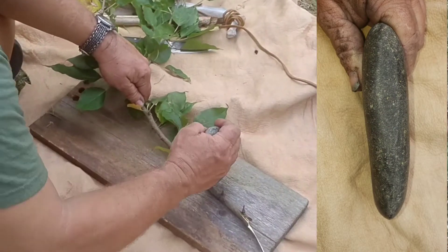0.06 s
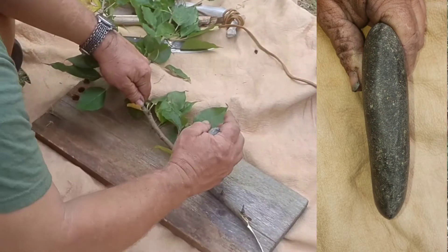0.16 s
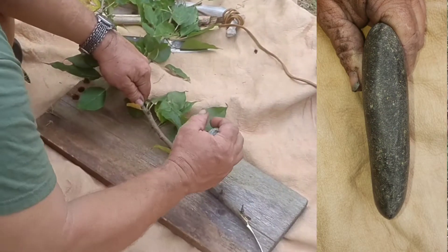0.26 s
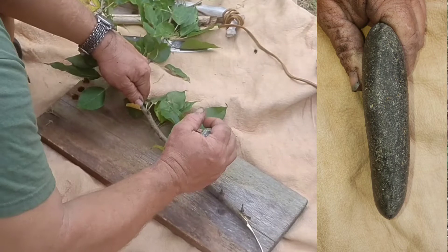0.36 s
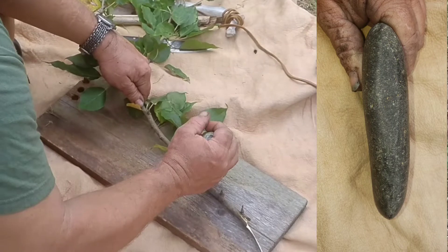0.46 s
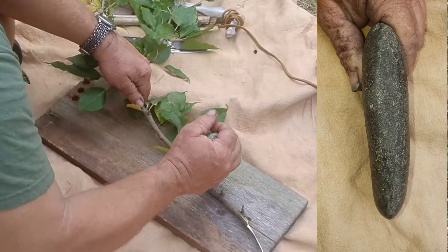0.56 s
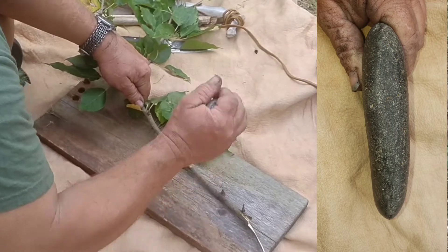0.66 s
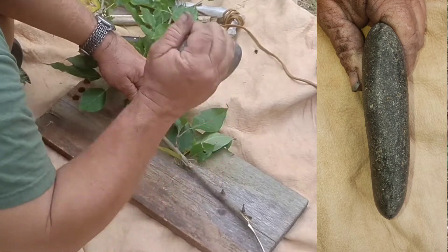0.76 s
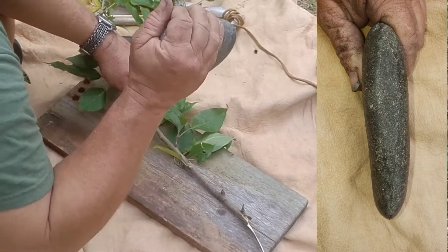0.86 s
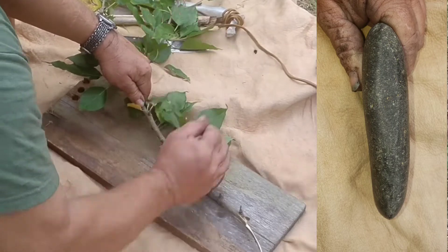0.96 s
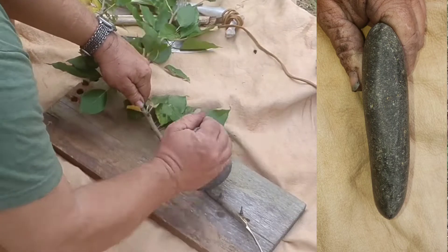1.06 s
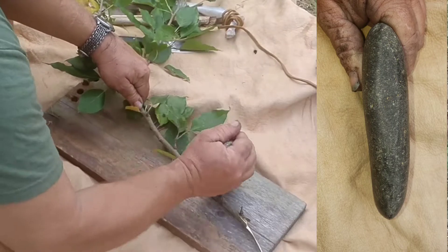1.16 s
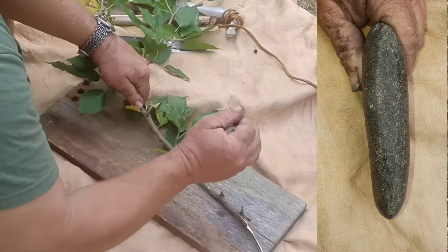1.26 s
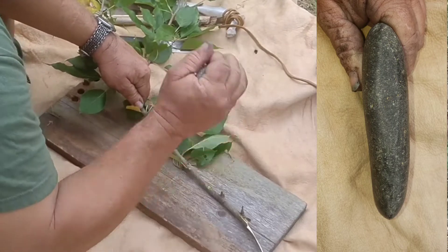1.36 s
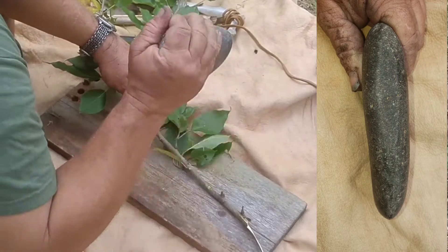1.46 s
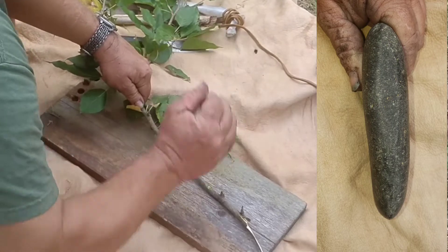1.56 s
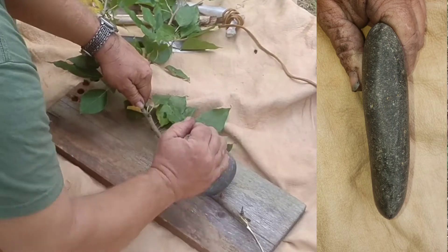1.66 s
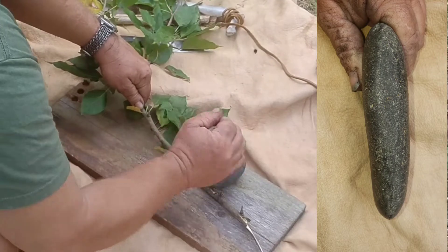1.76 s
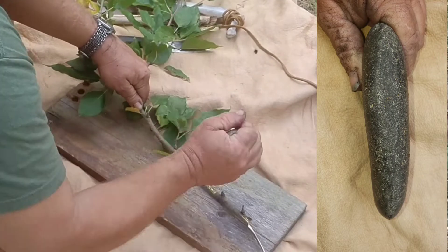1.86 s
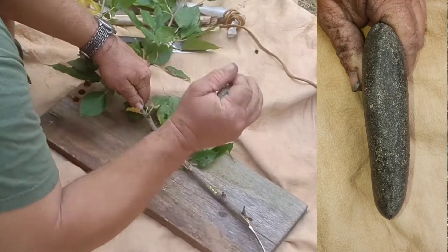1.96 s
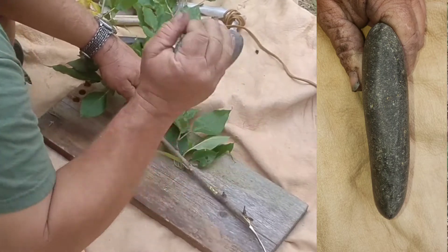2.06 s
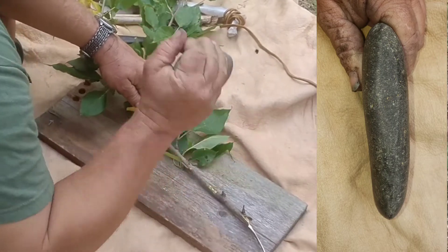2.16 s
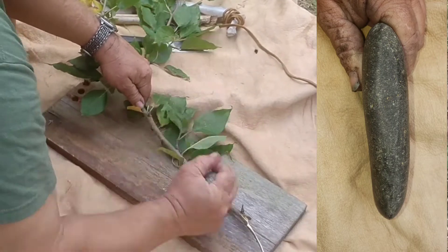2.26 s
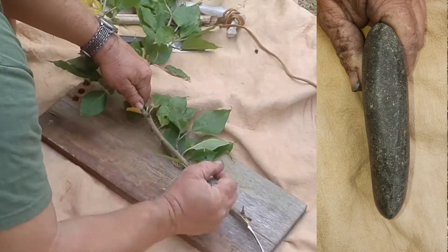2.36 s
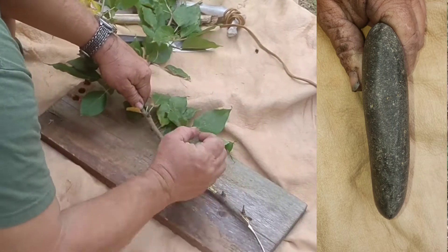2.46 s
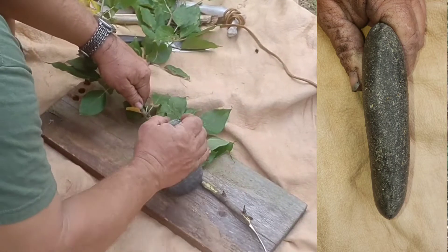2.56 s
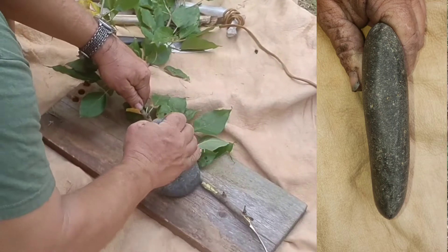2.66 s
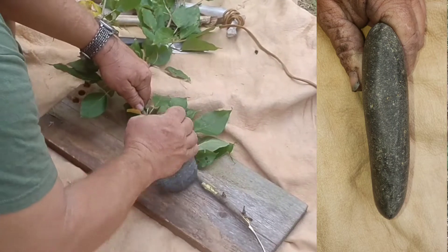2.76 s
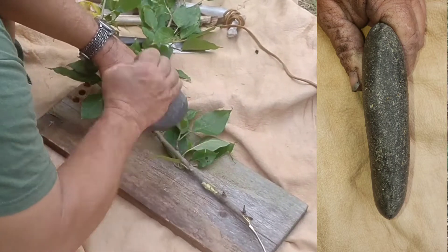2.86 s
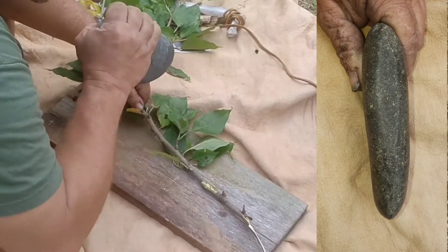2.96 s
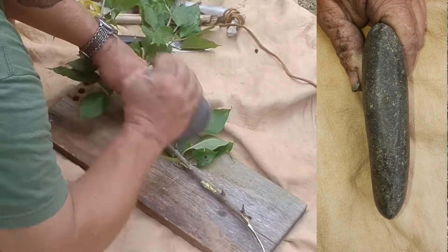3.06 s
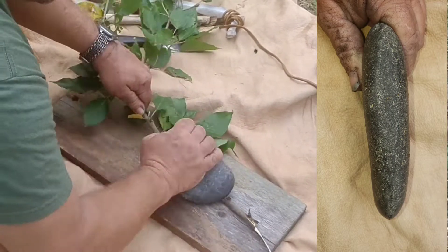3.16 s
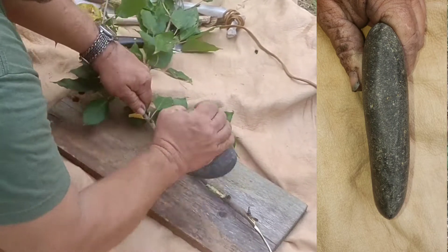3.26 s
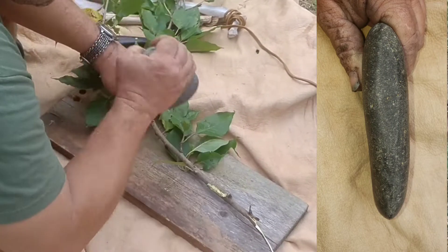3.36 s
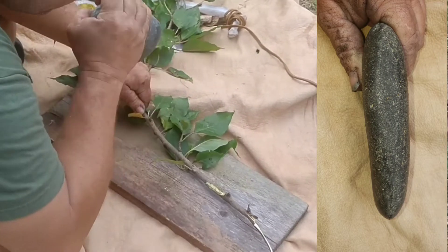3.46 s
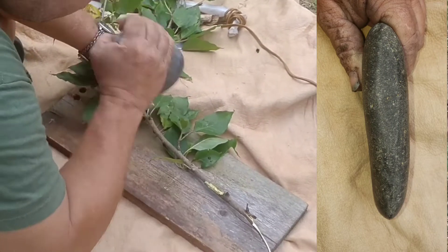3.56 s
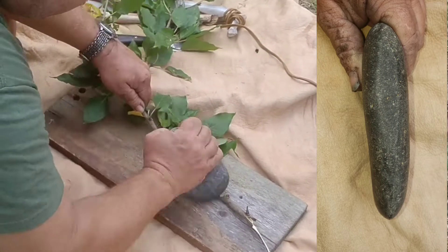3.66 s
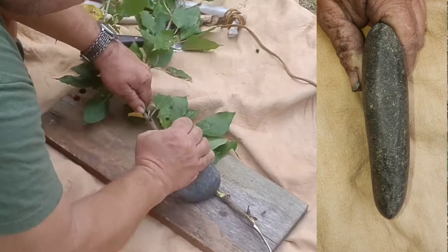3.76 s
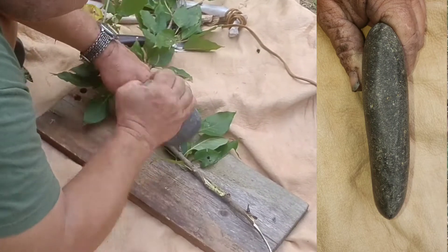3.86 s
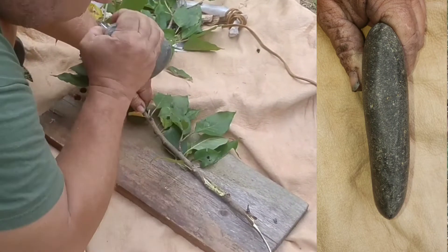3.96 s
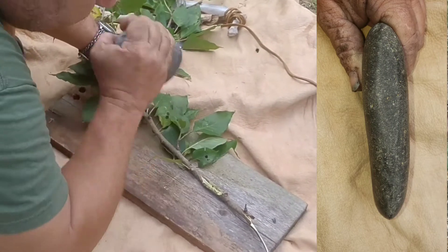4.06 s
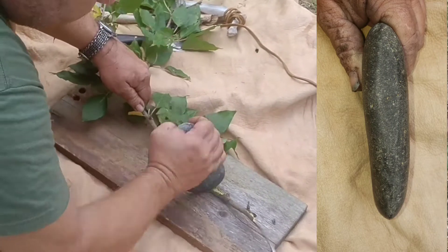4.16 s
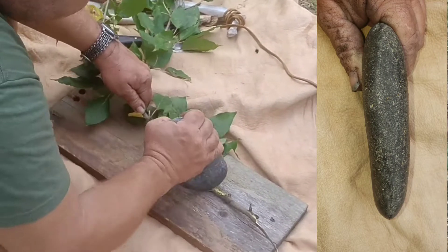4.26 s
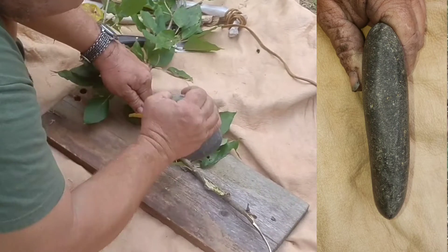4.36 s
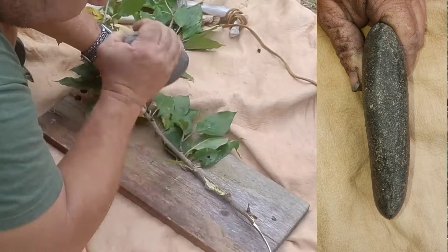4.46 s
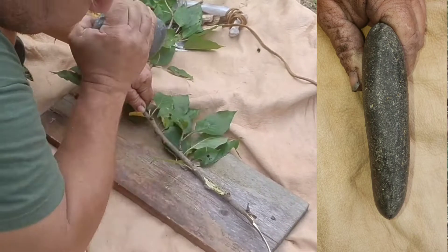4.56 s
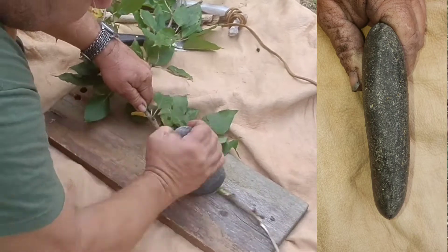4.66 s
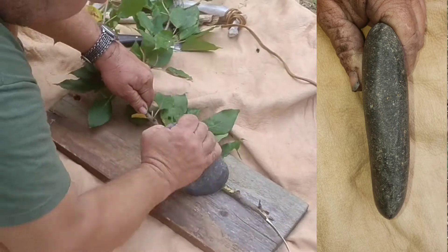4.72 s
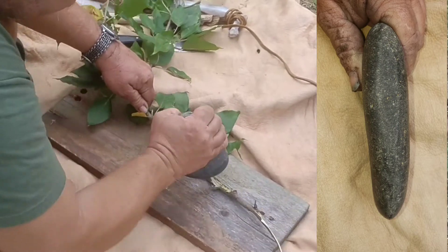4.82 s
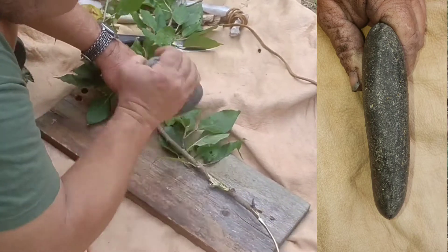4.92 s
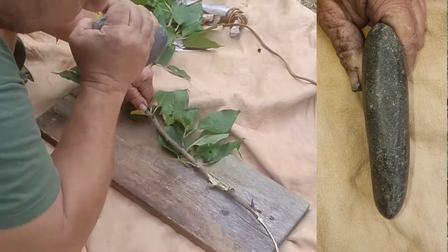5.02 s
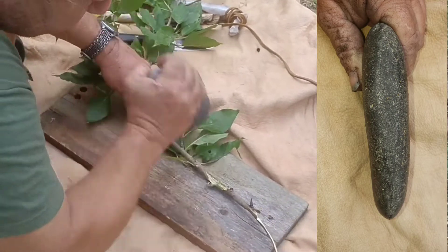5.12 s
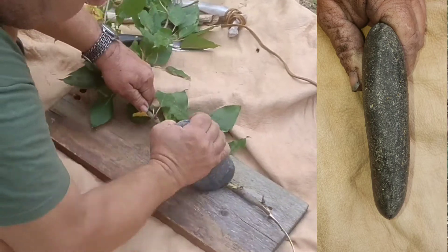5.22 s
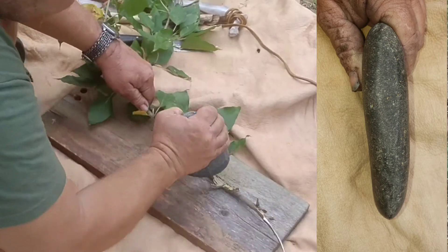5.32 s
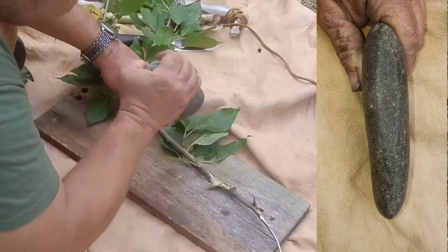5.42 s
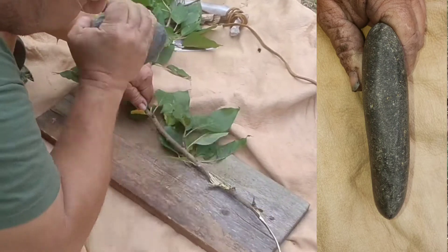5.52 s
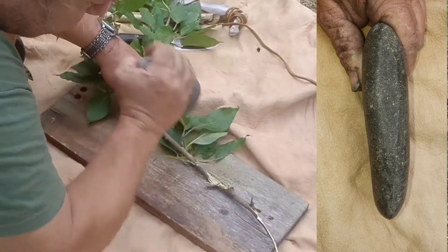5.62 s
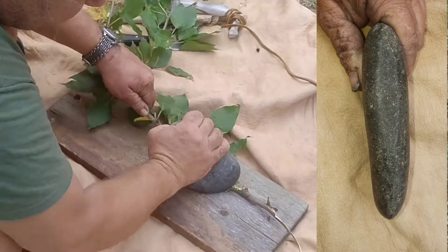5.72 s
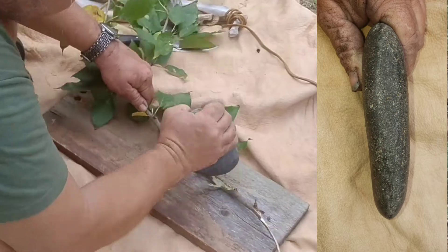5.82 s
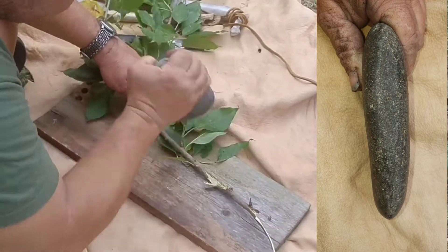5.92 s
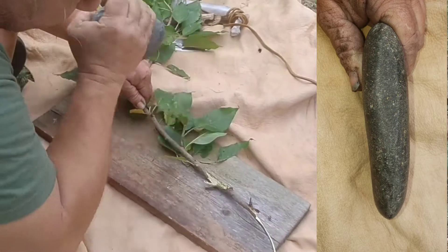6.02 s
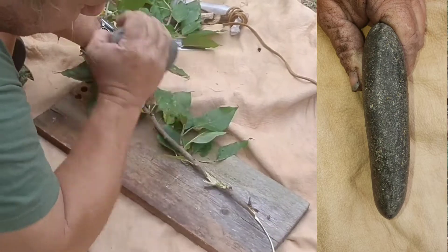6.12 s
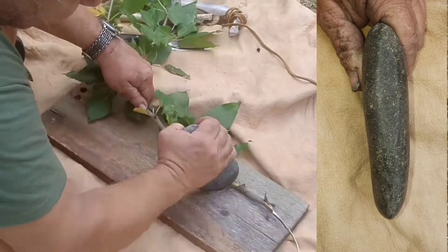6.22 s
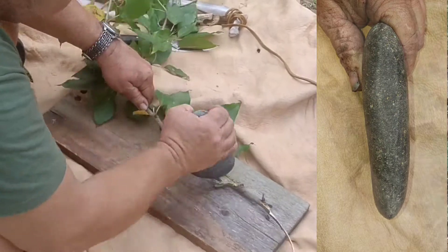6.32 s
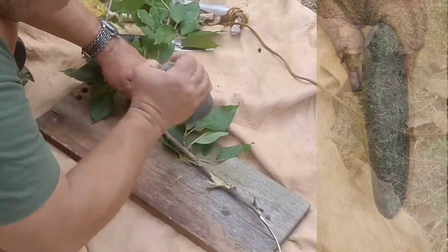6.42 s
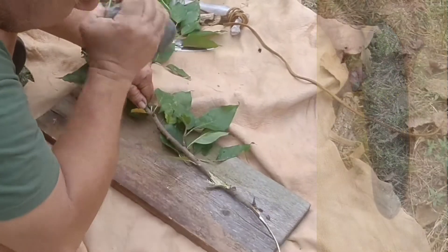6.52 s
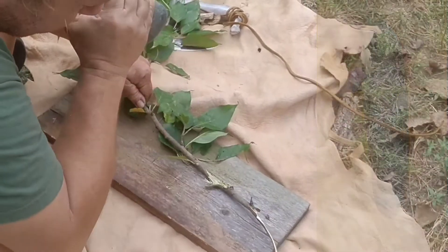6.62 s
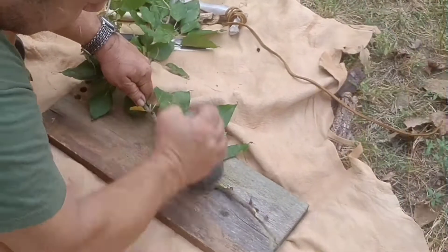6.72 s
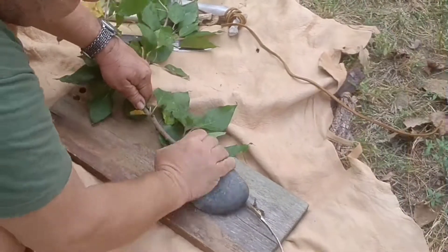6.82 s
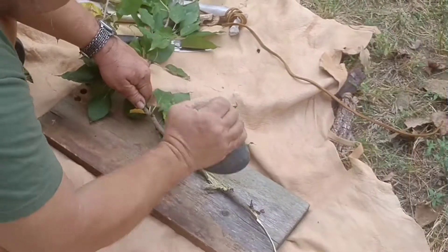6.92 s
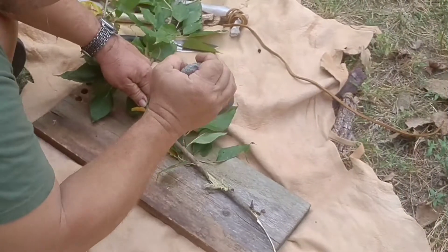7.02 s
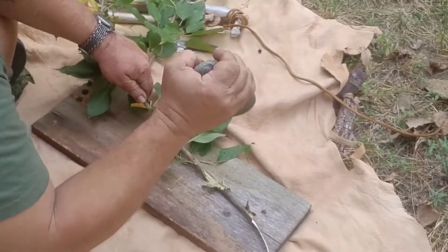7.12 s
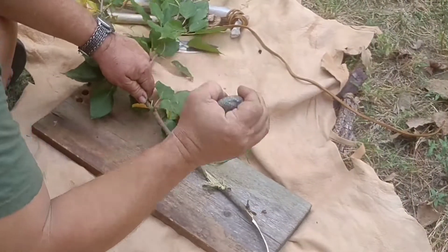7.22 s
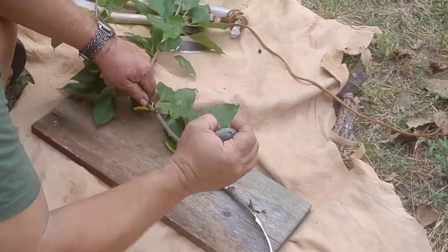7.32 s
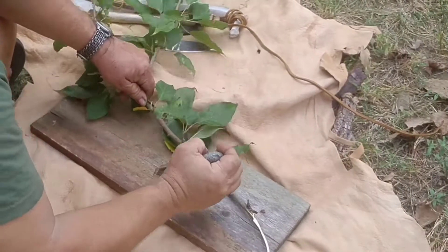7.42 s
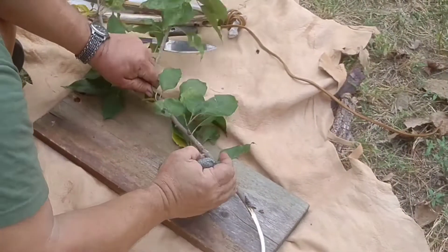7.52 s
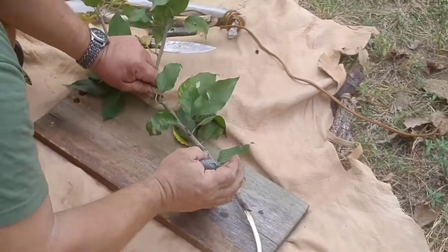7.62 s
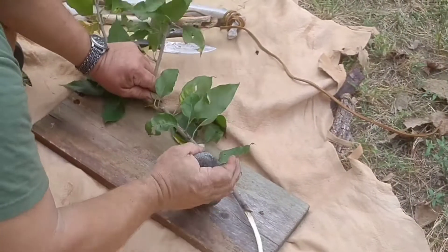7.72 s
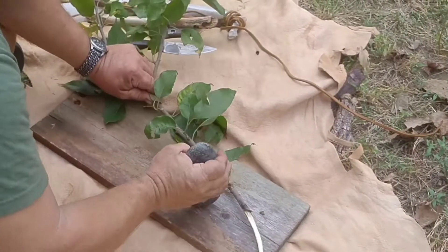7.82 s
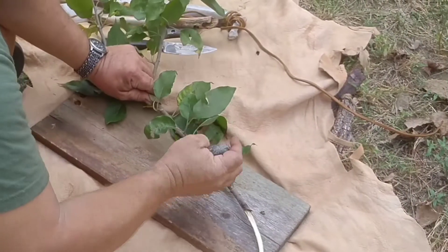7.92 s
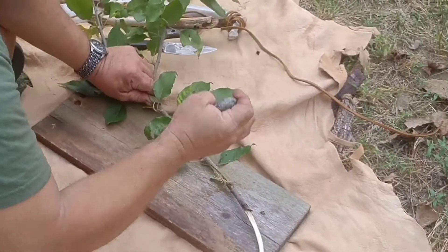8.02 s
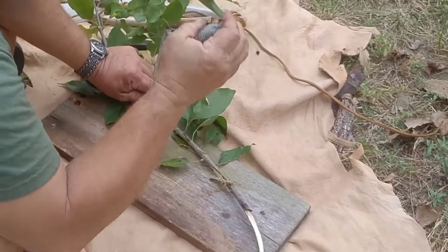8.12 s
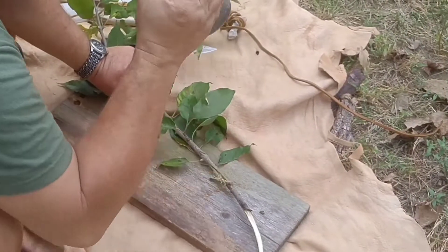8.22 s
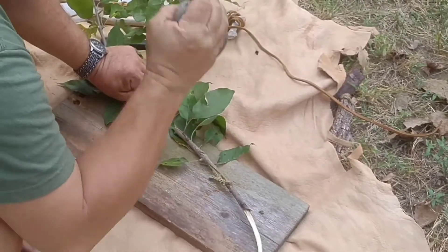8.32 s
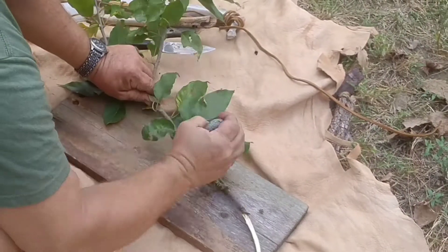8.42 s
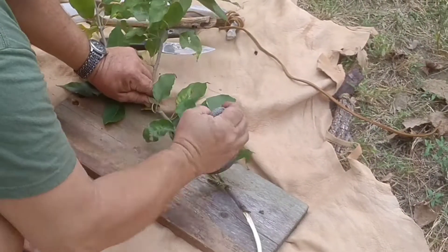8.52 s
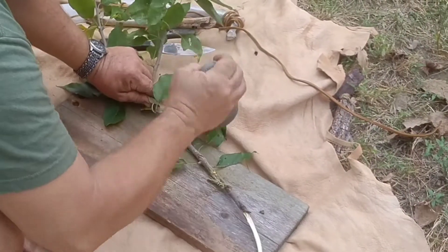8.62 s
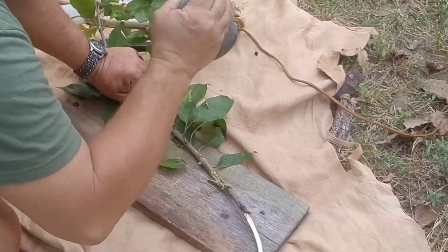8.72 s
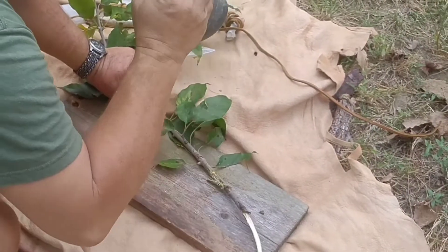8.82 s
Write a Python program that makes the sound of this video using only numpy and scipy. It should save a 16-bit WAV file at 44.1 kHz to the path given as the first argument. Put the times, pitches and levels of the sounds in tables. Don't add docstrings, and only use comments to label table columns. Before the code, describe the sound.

Stone axe blows crack into a green branch on a muffled wooden plank, about two a second, amid insect trills and wind rumble.

```python
import sys
import numpy as np
from scipy import signal
from scipy.fft import rfft, irfft
from scipy.io import wavfile
from scipy.ndimage import uniform_filter1d, minimum_filter1d

SR = 44100
rng = np.random.default_rng(int(sys.argv[2]) if len(sys.argv) > 2 else 0)


def volts_from_decibels(level):
    exponent = np.asarray(level, float) / 20
    return 10 ** exponent


def pcm_store(signal):
    levels = np.round(np.clip(np.atleast_2d(signal), -1, 1) * 32767)
    wavfile.write(sys.argv[1], SR, levels.astype(np.int16).T)


N = 391608


def evened(x):
    return x / np.sqrt(np.mean(x ** 2) + 1e-20)


def sized(x, db):
    return volts_from_decibels(db) * x / np.linalg.norm(x)


def curves(rows):
    s, *columns = np.transpose(rows)
    return [np.interp(np.arange(N) / SR, s, c) for c in columns]


def colour(x, points):
    f, db = np.transpose(points)
    hz = np.fft.rfftfreq(len(x), 1 / SR) + 1
    gain_db = np.interp(np.log(hz), np.log(f), db, db[0] - 30, db[-1] - 27.5)
    return irfft(rfft(x) * volts_from_decibels(gain_db), len(x))


def drift(hz):
    lowpass = signal.butter(2, hz, fs=SR, output="sos")
    return evened(signal.sosfilt(lowpass, rng.standard_normal(N)))


def steady(x, size):
    power = uniform_filter1d(evened(x) ** 2, size=size)
    return evened(x / abs(power + .05) ** 0.41)


def ring(x, hz, width):
    return signal.lfilter(*signal.iirpeak(hz, hz / width, SR), x)


def burst(db, t60, rise=0.0001):
    t = np.arange(9000) / SR
    level = volts_from_decibels(db - 60 * t / max(t60, .004)) * (1 - np.exp(-t / rise))
    return level * rng.standard_normal(len(t))


def add(mix, s, sound):
    part = mix[round(s * SR):][:len(sound)]
    part += sound[:len(part)]


# (pitch_hz, level_db)
AIR_TONE = [(30, -13.5), (150, 2.5), (500, 0.5), (1500, -3), (2200, -8), (3500, -9.5), (7000, -17),
            (15600, -22)]
# (time_s, level_db)
AIR_LEVEL = [(0, -60), (1.0, -61.5), (1.5, -64.5), (4.1, -62), (4.9, -64), (7.5, -60.5), (8.4, -59),
             (8.7, -63)]


def air():
    level_db = curves(AIR_LEVEL)[0] + 5.5 + .5 * drift(3.8)
    return volts_from_decibels(level_db) * evened(colour(rng.standard_normal(N), AIR_TONE))


# (time_s, level_db)
GUSTS = [(0, -50), (.2, -49), (.3, -35), (.47, -37), (.85, -42), (1.3, -45), (1.45, -48.5), (2.12, -49),
         (2.3, -43.5), (2.6, -39), (2.95, -43.5), (3.95, -47), (6.7, -46.5), (6.95, -40), (7.4, -44.5),
         (8.0, -45), (8.1, -50.5), (8.88, -47.5)]
# (pitch_hz, level_db)
RUMBLE_TONE = [(8.8, -36), (27, -11.5), (53, 6.5), (85, 3), (156, -27), (250, -46.5), (320, -60.5),
               (550, -120)]
# (time_s, push_db, flutter_db)
PUFFS = [(.1, -40, -43), (.27, -34.5, -34), (.78, -45, -46), (1.33, -47, -48), (1.48, -47, -68),
         (2.52, -44, -44), (2.719, -39, -71), (3.06, -39.5, -61), (3.3, -43, -43.5), (3.57, -46, -56),
         (4.12, -39, -38), (4.6, -48, -72), (5.14, -52, -71), (5.6, -45, -65), (6.58, -53, -70),
         (7.1, -41, -43), (7.32, -50, -53), (7.44, -51, -39), (7.981, -37, -43), (8.43, -44, -55),
         (7.85, -58, -44.5), (8.78, -50, -50)]
# (time_s, level_db)
HIGH_EDDIES = [(0.104, -31.5), (0.256, -30), (0.283, -31), (0.329, -27.5), (0.442, -33), (0.473, -39),
               (0.539, -55), (0.573, -49), (0.631, -37), (0.685, -34.5), (0.777, -32), (0.816, -31),
               (0.852, -39), (0.907, -41), (0.967, -43.5), (1.182, -52), (1.303, -42.5), (1.801, -43),
               (2.43, -45), (2.46, -45), (2.532, -34.5), (2.612, -43), (2.712, -48), (2.754, -51),
               (2.813, -59), (3.067, -48), (3.279, -36), (3.359, -39.5), (3.596, -47), (3.823, -44),
               (4.073, -45), (4.124, -34), (4.163, -38), (5.57, -48), (5.677, -43), (6.395, -48),
               (6.58, -52.5), (6.896, -36.5), (7.054, -35), (7.09, -40.5), (7.334, -35), (7.415, -35.5),
               (7.459, -35), (7.49, -34), (7.617, -38), (7.664, -46), (7.728, -44), (7.78, -43),
               (7.845, -36), (7.969, -50), (7.996, -42), (8.049, -41), (8.413, -44), (8.793, -47.5)]
# (time_s, level_db)
LOW_EDDIES = [(0.26, -25.5), (0.305, -31), (0.404, -33), (0.448, -34), (0.478, -30), (0.582, -35),
              (0.636, -36), (0.703, -28.5), (0.784, -29), (0.854, -32), (0.978, -38), (1.025, -40),
              (1.173, -33.5), (1.357, -36.5), (2.363, -46), (2.418, -38), (2.504, -36), (2.535, -44),
              (2.571, -33.5), (2.646, -37), (2.71, -27.5), (2.82, -32), (3.07, -32.5), (3.323, -37),
              (3.668, -34), (4.102, -36), (4.184, -36), (5.567, -34.5), (5.63, -37), (6.377, -41),
              (6.596, -37), (6.776, -44), (7.127, -34), (7.219, -38), (7.328, -32), (7.417, -33.5),
              (7.515, -42), (7.662, -40), (7.739, -32), (7.789, -35), (7.882, -37), (7.984, -29),
              (8.02, -34), (8.41, -37)]


def wind():
    puff_s, eddy_s = 0.052, 0.015
    thud_db, thud_rise_s, thud_t60 = -27, 0.0076, 0.33
    lead_s = 4000 / SR
    t = np.arange(-4000, 12000) / SR
    after = t[4000:]

    gust_db = curves(GUSTS)[0]
    push = volts_from_decibels(gust_db)
    shake = volts_from_decibels(-12.5 + gust_db + 0.83 * (gust_db + 34.0))
    puff = np.exp(-(t / puff_s) ** 2)
    for s, db, flutter_db in PUFFS:
        add(push, s - lead_s, volts_from_decibels(db) * puff)
        add(shake, s - lead_s, volts_from_decibels(flutter_db) * puff)

    push, shake = (push * volts_from_decibels(-1.5)) ** 2, (shake * volts_from_decibels(-5.5)) ** 2
    eddy = np.exp(-2 * (t / eddy_s) ** 2)
    for s, db in HIGH_EDDIES:
        add(shake, s - lead_s, volts_from_decibels(2 * (db - 1.5)) * eddy)
    for s, db in LOW_EDDIES:
        add(push, s - lead_s, volts_from_decibels(2 * db) * eddy)
    thud = (volts_from_decibels(thud_db - 60 * after / thud_t60) * (1 - np.exp(-after / thud_rise_s))) ** 2
    for s, *_ in CHOPS:
        add(push, s, thud)

    body = steady(colour(rng.standard_normal(N), RUMBLE_TONE), size=1500)
    flutter = ring(ring(ring(rng.standard_normal(N), 111, 96), 100, 91.5), 125, 86)
    flutter = evened(ring(steady(flutter, size=800), 110, 120))
    gusts = volts_from_decibels(1.5 * drift(28.5)) * (np.sqrt(push) * body + np.sqrt(shake) * flutter)
    vent = signal.butter(3, 40, "high", fs=SR, output="sos")
    return signal.sosfilt(vent, gusts)


def phrases(rows, swell_s):
    t, db, slack = np.arange(N) / SR, np.full(N, -100.), np.zeros(N)
    for start, end, top_db in rows[::-1]:
        on = slice(max(round(start * SR), 0), round(end * SR))
        db[on] = top_db
        slack[on] = np.exp((start - t[on]) / swell_s)
    return uniform_filter1d(db, size=1600), uniform_filter1d(slack, size=800)


def cricket(db, hz, rate, start, fall=0.081, duty=0.58):
    cycle = (start + np.cumsum(rate * (1 + 0.0069 * drift(2.2))) / SR) % 1
    stroke = np.minimum(cycle / duty, 1)
    pitch = hz * (1 + fall * (.1 - stroke ** 3.5) + 0.014 * drift(120))
    roughness = volts_from_decibels(1.2 * drift(30) + 1.4 * drift(300))
    shape = np.sin(np.pi * stroke ** 0.35) * roughness
    return volts_from_decibels(db) * evened(shape * np.sin(2 * np.pi * np.cumsum(pitch) / SR))


def trill(rows, top_hz, sag_hz, rate, start, fall):
    db, slack = phrases(rows, 0.39)
    return cricket(db - 5.5 * slack, top_hz - sag_hz * slack, rate, start, fall)


# (start_s, end_s, level_db)
LOW_CRICKET = [(.12, 1.3, -69.5), (1.77, 3.12, -69.5), (3.55, 4.9, -71), (5.42, 6.85, -68),
               (7.35, 8.65, -70)]
# (start_s, end_s, level_db)
NEIGHBOUR = [(-2.5, 0.19, -66.5), (-0.6, 1.1, -67.5), (0, 1.75, -69), (2.5, 5, -71), (1.5, 4.1, -68),
             (7.5, 7.2, -69.5), (6.5, 7.6, -69.5), (7.5, 8.5, -64), (9, 9, -73)]
# (start_s, end_s, level_db)
HIGH_CRICKET = [(-.3, .87, -69.5), (1.14, 2.36, -72), (2.7, 4.09, -69.5), (4.3, 5.66, -73),
                (5.85, 7.31, -71), (7.55, 8.6, -68)]


def crickets():
    near = trill(LOW_CRICKET, 7600, 380, 30.3, 0.083, fall=0.05)
    near += trill(NEIGHBOUR, 7600, 90, 30.05, 0.66, fall=0.099)
    near += trill(HIGH_CRICKET, 8170, 300, 31.2, 0.44, fall=0.029)
    chorus = evened(ring(ring(rng.standard_normal(N), 7750, 900), 7750, 900))
    return near + volts_from_decibels(-76.5) * chorus


def katydid(db, rate, wing, sharp=0.19, teeth_hz=300, same=.5):
    stroke = np.arange(N) * rate / SR % 1
    scrape = (0.31 + np.exp(-stroke / sharp)) * rng.standard_normal(N)
    teeth = scrape + same * np.roll(scrape, round(SR / teeth_hz))
    return volts_from_decibels(db) * evened(colour(teeth, wing))


def buzz(rows):
    db, slack = phrases(rows, 0.46)
    return db - 16.5 * slack


# (time_s, level_db)
TICKS = [(0.4903, -64), (0.5694, -58), (0.6424, -69), (0.692, -54), (0.7926, -52), (0.8854, -53),
         (1.0081, -52), (1.0884, -70), (1.172, -56), (1.2698, -54), (1.3628, -53), (1.479, -53),
         (1.5823, -51), (1.79, -55), (5.3926, -61), (5.4665, -53), (5.5503, -56), (5.6505, -53),
         (5.8436, -57), (5.9394, -54), (6.0302, -55), (6.127, -52), (6.2342, -52)]


def ticks():
    out, t = np.zeros(N), np.arange(900) / SR
    for s, db in TICKS:
        scrape = volts_from_decibels(db - 60 * t / .03) * (1 - np.exp(-t / .002))
        add(out, s, scrape * rng.standard_normal(len(t)))
    return volts_from_decibels(6.0) * ring(out, 11700, 4500)


# (start_s, end_s, level_db)
HIGH_BUZZ = [
    (-0.5, 0.474, -55.5),
    (3, 3.5, -72),
    (3.5, 5.18, -59),
    (7, 8.755, -58.5),
]
LOW_BUZZ = [(-0.5, 0.46, -57), (1.8, 3.04, -56), (2.5, 4.2, -57.5), (9, 3.8, -65), (3.5, 5.18, -64),
            (6.7, 9.3, -56.5), (8, 9, -49)]
MID_BUZZ = [
    (3.9, 5.18, -70.5),
    (6.9, 8.4, -68),
]
# (pitch_hz, level_db)
HIGH_WING = [(8000, -17), (10500, -2), (11800, 12.5), (12500, 18), (13200, 8.5), (15500, 7)]
LOW_WING = [(6500, -2.5), (8500, 5), (10000, 7), (11000, 6.5), (13000, -0.5), (15500, -11)]


def katydids():
    mid_wing = [(10300, -8.0), (10900, -3), (11500, -8)]  # (pitch_hz, level_db)
    high = katydid(buzz(HIGH_BUZZ) - 2.5, 109, HIGH_WING, .15)
    low = katydid(buzz(LOW_BUZZ) - 6, 95, LOW_WING, 0.25)
    middle = katydid(buzz(MID_BUZZ), 101, mid_wing, 0.33)
    return high + low + middle + ticks()


# (level_db, t60_s, leaves_db)
AFTER_CHOP = [(-21.5, 0.085, -31.5), (-12, 0.042, -35.5), (-15.5, 0.04, -31), (-15.5, 0.04, -33),
              (-15.5, 0.041, -31.5), (-12.5, 0.041, -40), (-18.5, 0.095, -36), (-13.5, 0.064, -49),
              (-17, 0.065, -34.5), (-12.5, 0.055, -46.5), (-13.5, 0.047, -27.5), (-14.5, 0.031, -51.5),
              (-16.5, 0.084, -49.5)]
# (time_s, level_db)
SETTLES = [(0.4706, -46), (.476, -38), (1.801, -45), (2.359, -38), (5.395, -58.5), (5.42, -43),
           (5.915, -37.5), (6.443, -40), (6.847, -24), (6.876, -40), (6.905, -36.5), (6.927, -39),
           (6.963, -54)]
# (pitch_hz, width_hz, level_db)
LOOSE_PLANK = [(197, 57, 6), (347, 58, 2.5), (443, 36, 0), (510, 25, 0.5), (577, 41, -3.5), (670, 140, -4),
               (997, 300, -9)]
# (pitch_hz, level_db)
LEAVES_TONE = [(300, 22), (1000, -9), (3000, 2), (6000, -11), (14000, -42)]


def chatter():
    pushes, rustle = np.zeros(N), np.zeros(N)
    rows = [(chop[0] + chop[-1] / 1000, *after) for chop, after in zip(CHOPS, AFTER_CHOP)]
    rows += [(s, db, .045, db - 22) for s, db in SETTLES]
    for s, db, t60, leaf_db in rows:
        settling, lingering = burst(db, t60, 0.001), burst(db - 23.5, 0.35, .001)
        add(pushes, s, settling + lingering)
        add(rustle, s - .008, burst(leaf_db - 7.5, 0.17, 0.00081))
    murmur = np.zeros(N)
    for k, (hz, width, db) in enumerate(LOOSE_PLANK):
        murmur += (-1) ** k * volts_from_decibels(db) * ring(pushes, hz, width)
    return volts_from_decibels(10) * murmur + colour(rustle * volts_from_decibels(3.1 * drift(200)), LEAVES_TONE)


# (pitch_hz, level_db, t60_s, start_turns)
PLANK_MODES = [
    (143, -4.5, 0.046, 0.62),
    (240, 0.5, 0.036, 0.13),
    (307, -7.8, 0.022, 0.4),
    (453, 1.9, 0.032, -0.23),
    (476, 1.6, 0.035, 0.23),
    (585, -4.5, 0.042, -0.07),
    (688, 1.8, 0.022, 0.18),
    (995, -5.8, 0.022, 0.13),
]
MUTE_DB = [0, -16, -16, -16]


def knock(mute_ms, slap_ms, hit_db, slap_db, pitch):
    t, sound = np.arange(4000) / SR, 0
    grip = 1 / (1 + np.exp((mute_ms / 1000 - t) / .0006))
    hit, slap = (0, 1, hit_db), (abs(slap_ms) / 1000, np.sign(slap_ms), slap_db)
    for late_s, push, levels_db in (hit, slap):
        u = np.maximum(t - late_s, 0)
        rise = push * (1 - np.exp(-u / .0003))
        for k, (hz, db, t60, turns) in enumerate(PLANK_MODES):
            fade_db = levels_db[k // 2] + db - 60 * u / t60 + MUTE_DB[k // 2] * grip
            sound = sound + rise * volts_from_decibels(fade_db) * np.sin(2 * np.pi * (pitch * hz * u + turns))
    return sound


# (time_s, long_bending_db, lower_knock_db, upper_knock_db, cloth_mutes_after_ms)
CHOPS = [(1.048, -11.5, 7.8, 2.3, 12.4), (1.6785, -2.0, 7.5, 5.9, 8.8), (2.295, -2.2, -23.8, -9.0, 9.0),
         (3.1749, -6.4, 1.8, -7.5, 10.3), (3.709, -2.3, -0.6, -6.2, 10.5), (4.2214, -6.8, -3.3, -3.7, 6.0),
         (4.7276, -4.3, -3.1, -30.0, 9.3), (5.2367, -0.4, 8.7, -0.5, 6.0),
         (5.7473, -4.2, -5.9, -30.0, 11.3), (6.2808, -8.0, -0.2, 0.1, 8.4),
         (6.7964, -4.8, -5.5, -9.9, 10.6), (7.5357, -29.8, 5.5, 3.3, 15.0), (8.4792, -6.6, -1.3, 0.5, 9.1)]
# (later_ms, negative for a pull; long_bending_db, lower_knock_db, upper_knock_db, clack_db)
SLAPS = [(-3.75, -10.9, -7.0, -5.3, -13.7), (-2.63, -30.0, 0.6, -30.0, -2.8),
         (3.44, -30.0, 0.2, -8.0, -11.3), (-2.43, -15.5, 0.2, -22.8, -30.0),
         (1.29, -28.8, 2.3, -11.3, -30.0), (1.1, -18.6, 8.9, 6.7, -7.1), (3.65, -30.0, 0.3, -11.7, -5.6),
         (3.68, -30.0, 9.2, -30.0, -2.2), (-1.97, -18.7, -0.9, -0.9, -27.9),
         (-1.44, -8.3, -6.9, -1.1, -20.0), (-2.2, -30.0, 1.0, 0.7, -13.3), (1.72, -30.0, 5.5, -5.3, -9.3),
         (-1.72, -8.6, -0.6, 2.7, -9.9)]
# (first_clack_db, pitch_factor)
LIE = [(-7.8, 0.998), (-30.0, 0.997), (-30.0, 0.991), (-21.7, 0.98), (-15.5, 0.987), (-9.4, 0.958),
       (-1.4, 0.977), (-2.1, 0.971), (-4.4, 0.95), (-30.0, 0.993), (-4.3, 0.997), (-12.2, 0.99),
       (-6.0, 1.002)]
# (time_s, level_db, pitch_hz,
# t60_s)
BOUNCES = [(0.4717, -29, 643.0, 0.04), (.473, -30, 520, .03), (0.4696, -28.7, 390.0, 0.06),
           (1.7949, -35.2, 293.0, 0.06), (1.7963, -20.1, 401.0, 0.018), (2.3519, -10.3, 423.0, 0.014),
           (2.3513, -23.7, 642.0, 0.044), (5.3994, -41.4, 483.0, 0.035), (5.395, -47.2, 523.0, 0.06),
           (5.405, -43.7, 417.0, 0.06), (5.4059, -38.0, 600.0, 0.01), (5.9067, -35, 405.0, 0.06),
           (5.9117, -36.6, 472.0, 0.06), (6.4323, -52.1, 310.0, 0.06), (6.4344, -38.2, 495.0, 0.029),
           (6.8302, -18.7, 429.0, 0.027), (6.8323, -21.7, 599.0, 0.029), (7.5362, -14, 205, .06),
           (2.352, -29, 210, .05), (6.875, -33, 450, .025), (6.93, -34, 400, .025), (6.967, -38, 480, .025)]


def plank():
    out, t = np.zeros(N), np.arange(4000) / SR
    for chop, slap, (clack_db, pitch) in zip(CHOPS, SLAPS, LIE):
        s, *hit_db, mute_ms = chop
        slap_ms, *slap_db = slap
        add(out, s, knock(mute_ms, slap_ms, hit_db + [clack_db], slap_db, pitch))
    for s, db, hz, t60 in BOUNCES:
        level = volts_from_decibels(db - 60 * t / t60) * (1 - np.exp(-t / .001))
        add(out, s, level * np.sin(2 * np.pi * hz * t))
    return out


def bite(hold_ms, t60, rise):
    t = np.arange(9000) / SR
    ending = np.maximum(t - hold_ms / 1000, 0)
    level = volts_from_decibels(-60 * ending / max(t60, .003)) * (1 - np.exp(-t / rise))
    return level * np.sign(rng.standard_normal(len(t)))


def fizz(x):
    band = signal.butter(2, [6500, 13000], "band", fs=SR, output="sos")
    return volts_from_decibels(-3.5) * signal.sosfilt(band, x)


# (time_s, level_db, pitch_hz,
# top_end_db)
SNAPS = [(0.4742, -38, 1700, -75), (.463, -49, 3000, -75), (.502, -48, 2450, -75), (0.473, -34, 1020, -70),
         (.482, -40, 850, -75), (1.056, -27, 2800, -24), (1.0605, -30, 1800, -47), (1.0914, -48, 2230, -60),
         (1.838, -47, 2870, -64), (1.8378, -50, 4900, -70), (2.3025, -25, 2650, -52),
         (2.304, -35, 1700, -60), (3.184, -23, 2560, -29), (3.711, -18, 1760, -39),
         (4.7356, -31, 1830, -50), (4.8224, -52, 2270, -62), (5.2447, -20, 1910, -47),
         (5.269, -48, 1700, -70), (5.759, -37, 3300, -56), (5.7625, -32, 1900, -60),
         (5.765, -41, 3500, -54), (5.9104, -50, 2810, -59), (6.808, -30, 5000, -39),
         (6.811, -21, 2800, -50), (6.812, -22, 1490, -56), (6.834, -47, 3500, -62), (7.344, -47, 3140, -57),
         (7.6004, -46, 7140, -56), (7.6894, -54, 7430, -58), (8.4905, -45, 2700, -60),
         (8.4972, -41, 3640, -58), (8.5, -41, 2900, -65), (8.5082, -36, 3530, -61),
         (8.51, -36.5, 1600, -65), (8.5165, -48, 2300, -68), (8.528, -56, 2500, -68)]


def snaps():
    out = np.zeros(N)
    for s, db, hz, top_db in SNAPS:
        snap = ring(ring(burst(0, 0.0154, 0.00014), hz, 0.27 * hz), hz, 1.5 * hz)
        add(out, s, sized(snap, db + 14.0) + fizz(burst(top_db, 0.025, 0.00095)))
    return out


# (time_s, plank_end_clack_db, branch_knock_db, top_end_db)
CRACKS = [(1.047, 0, 6.5, -11), (1.6776, 7, -13, -4), (2.2944, 0, -20, -4), (2.352, -22.6, -40, -38),
          (3.1746, -16, -27, -5), (3.7076, 6.5, 0, -2.5), (4.2202, -1.5, -25, -11), (4.7264, 5.5, -19, -2),
          (5.2358, 4, -14, -10), (5.7473, -17, -16, -11), (6.279, 4.5, -10, -14), (6.7955, 11.5, -3, -9.5),
          (7.5377, -2, -10, -32.5), (8.4762, 10, -22, -11)]
# (level_db, level_db, level_db, level_db, level_db)
EDGE_RING = [(2.5, 2.5, -3.5, -9.5, -6.5), (1, 4.5, -0.5, -14, -7), (-5, 7, 3, -6, 1.5),
             (-32, -34, -36, -43, -38.0), (-6.5, 5, -3, -7, -5), (5, 2.5, -3, -4, -2.5),
             (2, 2.5, 2.5, -6.5, -4), (-12, 3.5, -3.5, -1, -5), (1, -8, -5.5, -18, -7.5),
             (-0.5, 1.5, -4.5, 0.5, -19.5), (-5.5, -3, -10, -8.5, -18), (4.5, -3, 0.5, 0.5, -5.5),
             (-26, -23, -39, -28, -26.3), (-14, -6.5, -18, -7, -18)]
CLACK_LATE_MS = [0, 0.014, 0, 0, 0.36, 0, 0.12, 0.3, 0.27, 0.76, 0, 0.011, 0.047, 1.45]
# (cutting_ms, then_dies_t60_s, plank_middle_db, stone_tip_db, stone_heel_db)
BITES = [(1.6, 0.013, 5.5, -27, -16.5), (1, 0.012, -21, -28, -26), (2, 0.0075, -0.5, -19, -13.5),
         (3.5, .02, -50, -55, -50), (0.76, 0.011, 4.5, -15, -16), (2.1, 0.015, -28, -18, -9),
         (2.4, 0.0064, -4, -30, -20), (0.71, 0.011, -15, -31.5, -7), (2.1, 0.004, 8.5, -40.5, -28.5),
         (1.7, 0.0042, 4, -19, -15), (1.7, .006, 7.5, -22, -26), (1.2, .012, -1, -31.5, -17),
         (3.6, .014, -27, -45, -37), (8.1, 0.0085, -13, -19, -16)]
# (pitch_hz, width_hz)
BITE_TONES = [
    (1080, 150),
    (1480, 640),
    (1950, 700),
    (2680, 430),
    (3460, 490),
    (4250, 700),
    (5400, 610),
              (810, 150),
    (6100, 500),
    (7350, 1340),
]
# (pitch_hz, width_hz)
GAPS = [(2290, 320), (2920, 300), (4900, 420), (6480, 450)]


def branch():
    wood_late_s, wood_rise_s, wood_t60 = .0006, 0.00072, 0.017
    bark = np.hanning(8)[1:-1]
    out = snaps()
    for crack, stone_db, late_ms, cut in zip(CRACKS, EDGE_RING, CLACK_LATE_MS, BITES):
        s, clack_db, knock_db, top_db = crack
        hold_ms, t60, *extra_db = cut
        add(out, s, sized(fizz(bite(hold_ms, t60, 0.00049)), top_db - 9.5))

        breaks = bite(hold_ms, t60, 0.0002)
        breaks[24:30] += 1.26 * bark
        wood = bite(hold_ms, wood_t60, wood_rise_s)
        clack = bite(0.82, 0.023, 0.0015)
        clack[24:30] += 2.5 * bark

        sound = np.zeros(9000)
        levels_db = [clack_db, knock_db, *stone_db, *extra_db]
        for k, ((hz, width), db) in enumerate(zip(BITE_TONES, levels_db)):
            if k == 0:
                source, late_s = clack, late_ms / 1000
            elif k in (1, 2, 7):
                source, late_s = wood, wood_late_s
            else:
                source, late_s = breaks, 0
            rung = ring(ring(source, hz, width), hz, 2.3 * width)
            add(sound, late_s, (-1) ** k * sized(rung, db))
        for hz, width in GAPS:
            sound = sound - 0.46 * ring(sound, hz, width)
        add(out, s, sound)
    return out


def scene():
    yard = air() + wind() + crickets() + katydids()
    return (yard + chatter() + plank() + branch())[None]


def roll_off(x):
    return signal.sosfilt(signal.butter(12, 16830, fs=SR, output="sos"), x)


def record(dry):
    room = minimum_filter1d(1 / np.maximum(abs(dry), .97), size=61, axis=1)
    held = dry * uniform_filter1d(room, size=61, axis=1)
    below = signal.oaconvolve(held, signal.firwin(511, 15650, fs=SR)[None], "same")
    loud = uniform_filter1d(held ** 2, size=600, axis=1) > volts_from_decibels(-30)
    opened = uniform_filter1d(1. * loud, size=200, axis=1)
    mix = below + opened * (held - below)
    edge = signal.firwin(255, 16550, fs=SR)[None]
    return roll_off(signal.oaconvolve(mix, edge, "same"))


dry = scene()
out = record(dry)
pcm_store(out)
```